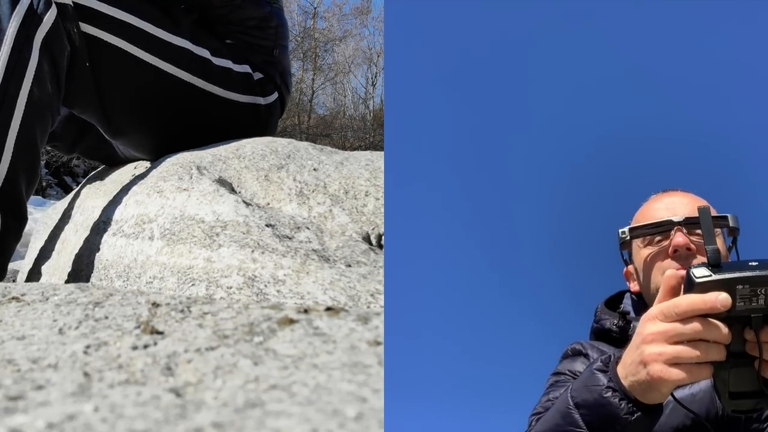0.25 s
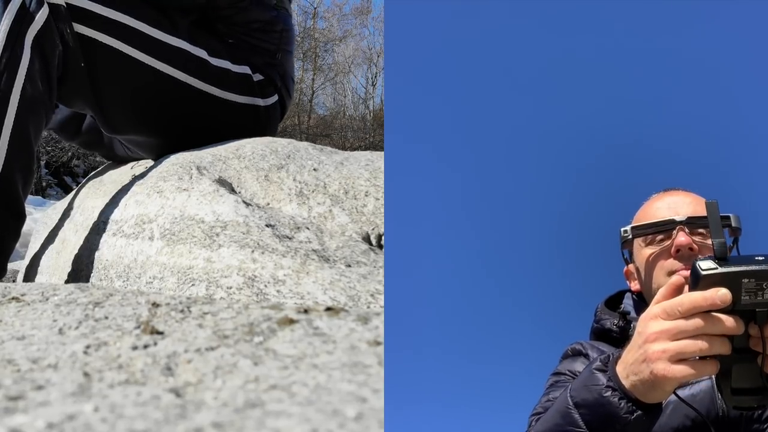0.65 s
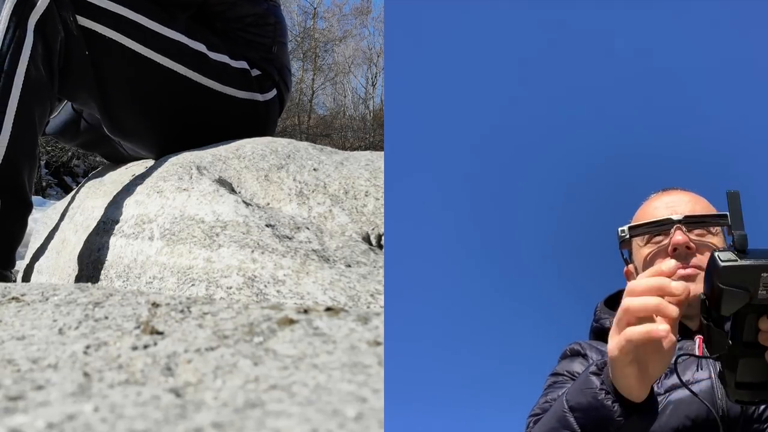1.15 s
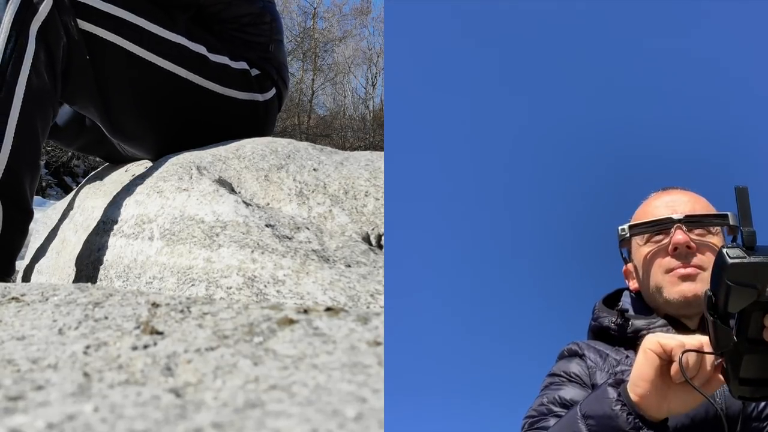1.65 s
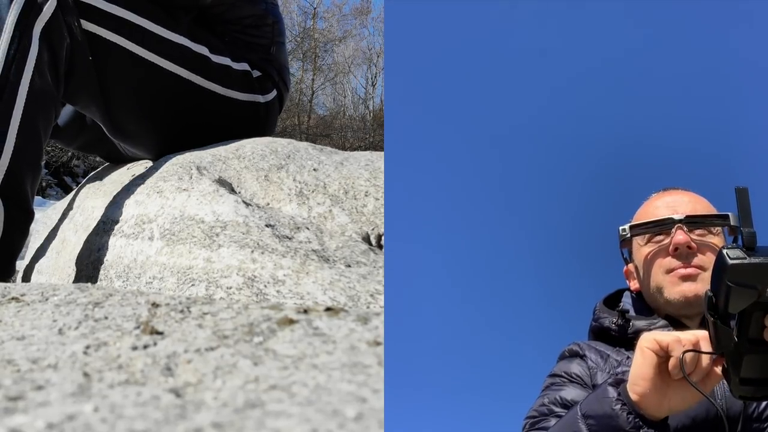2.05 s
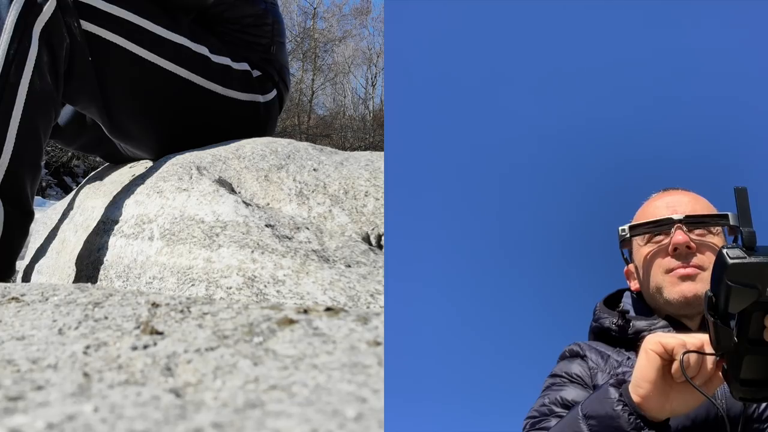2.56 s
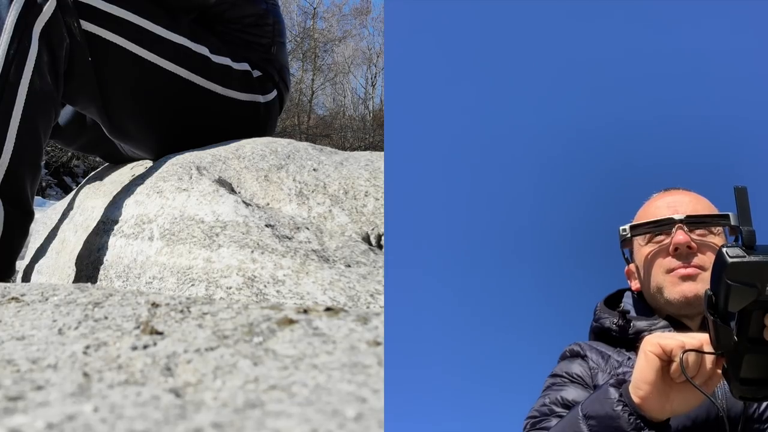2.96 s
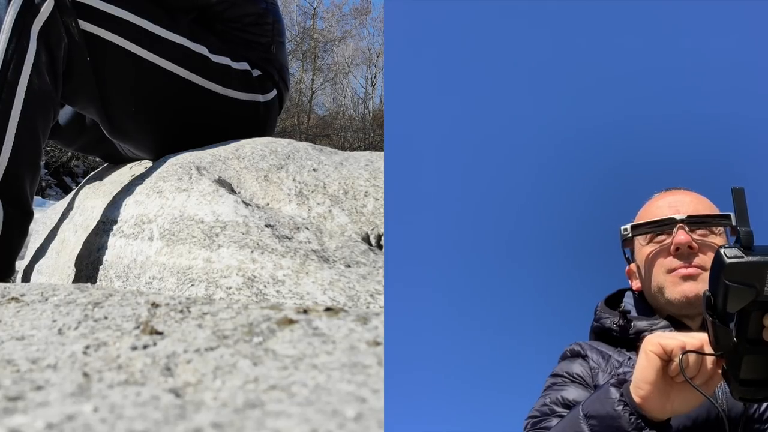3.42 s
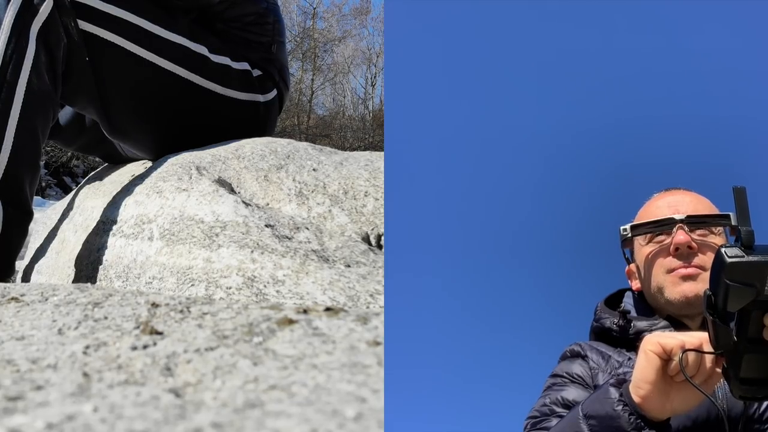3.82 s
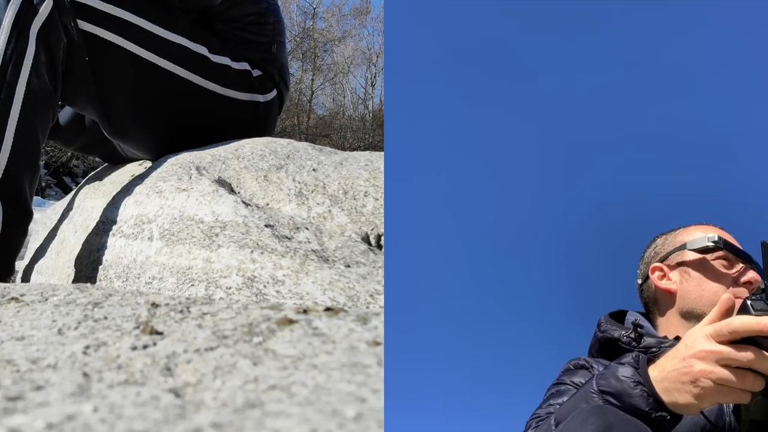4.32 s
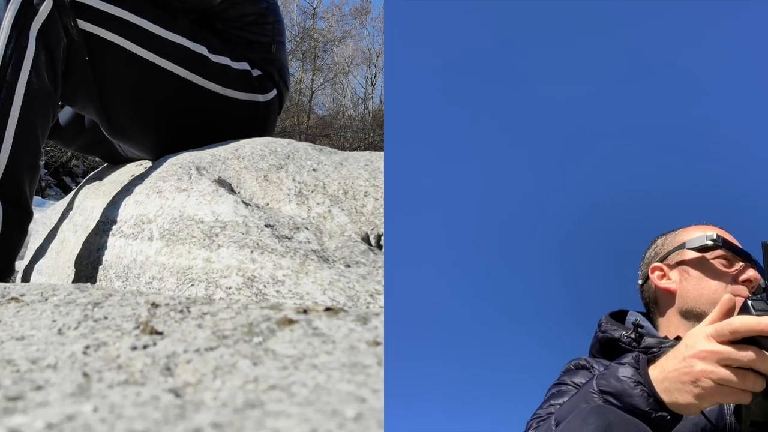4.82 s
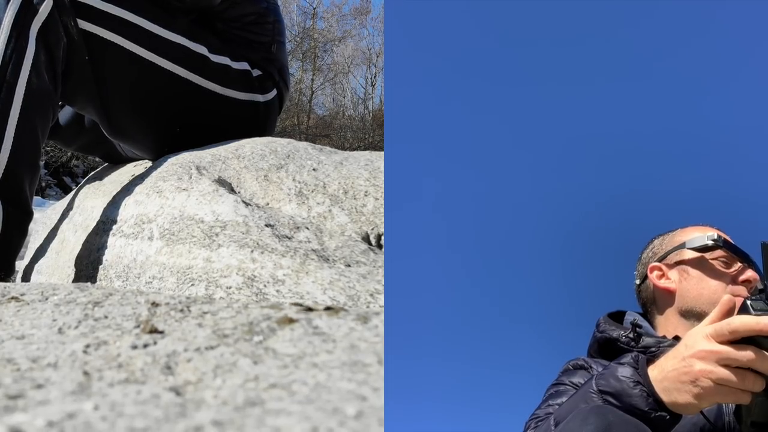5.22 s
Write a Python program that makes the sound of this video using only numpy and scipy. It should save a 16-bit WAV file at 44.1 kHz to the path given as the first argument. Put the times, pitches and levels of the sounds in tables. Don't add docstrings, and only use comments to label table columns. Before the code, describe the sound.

Faint fan hiss over a low wavering hum, a brief nylon rub, then four small rotors abruptly start and climb to a harsh buzzing roar.

```python
import sys
import numpy as np
from scipy import signal
from scipy.fft import rfft, irfft, next_fast_len
from scipy.io import wavfile

SR = 44100
rng = np.random.default_rng(int(sys.argv[2]) if len(sys.argv) > 2 else 0)


def output_pcm(signal):
    pcm = np.clip(np.atleast_2d(signal).T, -1, 1) * 32767
    wavfile.write(sys.argv[1], SR, np.round(pcm).astype(np.int16))


def amplitude_ratio(level_db):
    exponent = np.asarray(level_db, float) / 20
    return 10 ** exponent


N = 241646
TIME = np.arange(N) / SR
SIZE = next_fast_len(N + 256, True)
FREQ = np.maximum(np.arange(SIZE // 2 + 1) * SR / SIZE, 1)

# (blade rate at the start [Hz], gain of the unchecked motor [Hz], rate held by the governor [Hz],
# later creep [Hz], bend of the creep [under 1 early, over 1 late])
ROTORS = [
    (163.6, 396, 356, 28, .5),
    (161.4, 392, 351, 14.04, 2.208),
    (123.45, 350, 330, 17, 1.4),
    (130.4, 385, 336, 25, 1.8),
]
START_S, HANDOVER_S = 4.298, .94 + 4
FULL_HZ = 350


def curves(table, off_db=-120):
    s, *columns = np.transpose(table)
    gate_db = np.interp(TIME, [s[0] - .003, s[0], s[-1], s[-1] + 0.015], [off_db, 0, 0, off_db])
    return [np.interp(TIME, s, c) for c in columns], amplitude_ratio(gate_db)


def tilt(hz, points):
    f, db = np.transpose(points)
    return amplitude_ratio(np.interp(np.log(hz), np.log(f), db))


def noise(gain):
    x = irfft(rfft(rng.standard_normal(SIZE)) * gain, SIZE)[:N]
    return x / x.std()


def walk(rate_hz, time=TIME):
    grid = np.arange(2400)
    x = irfft(rfft(rng.standard_normal(len(grid))) / (1 + (grid[:1201] / 6 / rate_hz) ** 4))
    return np.interp(time, grid / 400, x / x.std())


def banded(points, swell_db, flicker_db, flicker_hz, gate=np.ones(N)):
    live = np.flatnonzero(gate > 1e-5)
    size = next_fast_len(len(live), True)
    hz = np.maximum(np.arange(size // 2 + 1) * SR / size, 1)
    time, out = TIME[live], np.zeros(N)
    swell = swell_db * walk(0.63, time)
    spectrum = rfft(rng.standard_normal(size)) * tilt(hz, points)
    for octave in np.arange(4, 15):
        band = np.cos(np.pi / 2 * np.clip(np.log2(hz) - octave, -1, 1)) ** 2
        flicker = flicker_db * walk(flicker_hz, time)
        out[live] += irfft(spectrum * band, size)[:len(live)] * amplitude_ratio(swell + flicker)
    return out / out[live].std()


def turn(hz):
    return 2 * np.pi * (np.cumsum(hz) / SR + rng.random())


def shift(x, lag_s, gain=1):
    return irfft(rfft(x, SIZE) * gain * np.exp(-2j * np.pi * FREQ * lag_s), SIZE)[:N]


def lulls(rows):
    return sum(db * np.exp(-((TIME - s) / width_s) ** 2) for s, width_s, db in rows)


def blade_rate(start_hz, gain_hz, held_hz, creep_hz, bend):
    inertia_s, spin_up_s, settle_s, creep_s = .025, .9, 5.22, .26
    overshoot_hz, overshoot_s, knee_hz = 11, 0.1313, 4.03
    run = np.maximum(TIME - START_S, 0)
    run = run - inertia_s * (1 - np.exp(-run / inertia_s))
    climb = start_hz + gain_hz * (1 - np.exp(-run / spin_up_s))
    over = overshoot_hz * np.exp(-((TIME - settle_s) / overshoot_s + 1) ** 2 * 2)
    held = held_hz + over + creep_hz * (np.maximum(TIME - settle_s, 0) / creep_s) ** bend
    return -knee_hz * np.logaddexp(-climb / knee_hz, -held / knee_hz)


def rotors():
    orders = [(.5, -18.5, -14, -15.5, -22), (1, 1.5, 5.5, -5, 7.5), (1.5, -33, -21.5, -43, -22),
              (2, 2.5, -2.5, 5, 6.5), (1.9, -34, -22.5, -26, -29), (4, -30, -29, -21, -26),
              (5.2, -23, -18, -35, -21), (3, -10, -2.5, -1.5, -15), (4, 3.5, -8.5, 4, -12),
              (5, -13, -7, -16.5, -14.5), (6.8, -10.5, -36, -22, -25.5), (7, -15.5, -30, -4, -23),
              (8.8, -25, -33, -12, -26)]
    # (frequency [Hz], level [dB])
    air_path = [(80, 4), (200, 2.5), (400, -2), (500, -7), (580, -2), (730, 4.5), (1050, 1.5), (1250, 1.5),
                (1500, -6), (3000, 0)]
    # (multiple of the blade rate, shell resonance [Hz], width [Hz], level of rotors one to four [dB])
    whines = [(14.2, 2420, 600, -50, -37.5, -47, -52), (14, 4700, 900, -50, -42, -46, -50),
              (48, 8800, 650, -56, -43, -43, -54), (24, 8200, 700, -46, -43, -44, -45)]
    # (while climbing [dB], once governed [dB])
    speed_levels = [(-49, -26), (-20, -25), (-23, -27), (-41, -30.5)]
    # (time [s], half width [s], level [dB])
    rotor_dips = [
        [(5.17, 0.025, -5)],
        [(5.14, 0.022, -13), (4.4, .03, -3), (4.33, 0.053, -3.5)],
        [(5.08, 0.064, -22), (4.8, 0.083, -4)],
        [(5.3, 0.07, -9.5), (5.47, .04, -2.5)],
    ]
    gate = np.clip((TIME - START_S) / .004 + 1, 0, 1)
    live = gate > 0
    time, out = TIME[live], np.zeros(N)
    governed = .5 + .5 * np.tanh((time - HANDOVER_S) / 0.017)
    for r in range(4):
        hz = blade_rate(*ROTORS[r])[live]
        climbing_db, governed_db = speed_levels[r]
        db = climbing_db + (governed_db - climbing_db) * governed
        db = db + 13.5 * np.log2(hz / FULL_HZ) + lulls(rotor_dips[r])[live]
        phase = turn(hz * (1 + 0.00397 * walk(25, time)))
        for k, *order_db in orders:
            flutter_db = np.minimum(.8 * k, 4.5) * walk(35, time) - 3.3 * k * (1 - hz / 360)
            tone = np.sin(k * phase + 2 * np.pi * rng.random())
            out[live] += tilt(k * hz, air_path) * amplitude_ratio(db + order_db[r] + flutter_db) * tone
        for k, shell_hz, width_hz, *whine_db in whines:
            ring = 1 / (1 + (2 * (k * hz - shell_hz) / width_hz) ** 4)
            out[live] += ring * amplitude_ratio(whine_db[r] + 3.2 * walk(40, time)) * np.sin(k * phase)
    return gate * out


def wash(low_db, high_db):
    # (time [s], level [dB])
    effort = [
        (4.29, -77),
        (4.308, -42),
        (4.44, -38.5),
        (4.78, -30.5),
        (4.98, -25.5),
        (5.18, -27),
        (5.36, -34.5),
        (5.48, -28.5),
    ]
    # (frequency [Hz], level [dB])
    roar_colour = [(60, -2), (200, -13), (350, -11.5), (500, -20.5), (600, -18.5), (750, -5.5), (1000, 2.5),
                   (1200, -6.5), (1380, 2), (2720, -6.5), (2950, -11), (4500, -27), (7000, -26)]
    # (frequency [Hz], level [dB])
    tip_colour = [(2000, -30.5), (3000, 9), (4300, -2), (5500, 2.5), (7000, -2.5), (8500, -2.5), (10000, 0),
                  (12300, -3.5), (15300, -5.5)]
    (db,), gate = curves(effort)
    treble_db = -30 + 14 * np.log2(blade_rate(*ROTORS[1]) / FULL_HZ)
    treble_db = treble_db + 3 * (TIME > HANDOVER_S)
    treble_db = treble_db - 8 * np.exp(-np.maximum(TIME - START_S, 0) / 0.017)
    roar = amplitude_ratio(db + low_db) * banded(roar_colour, 0.77, 2.36, 25, gate)
    onset = np.clip((TIME - effort[0][0]) / .015, 0, 1) ** 2
    hiss = onset * amplitude_ratio(treble_db + high_db) * banded(tip_colour, 0.24, 2.0, 39, gate)
    return gate * (roar + hiss)


def fan():
    # (frequency [Hz], width [Hz], level [dB])
    duct_rows = [(1148, 13, -16.5), (1460, 217, -0.5), (1946, 108, -5), (2408, 103, -3.5), (2707, 67, -5.5),
                 (3115, 23.4, -1), (3447, 64, -3.5), (3650, 33, -24.5)]
    ducts = sum(amplitude_ratio(2 * db) / (1 + (2 * (FREQ - hz) / width_hz) ** 4) for hz, width_hz, db in duct_rows)
    return amplitude_ratio(-59.5 + 0.55 * walk(16)) * noise(np.sqrt(ducts))


def fan_whine():
    # (frequency [Hz], level [dB])
    shaft_lines = [(1087.5, -66), (1359, -69.5), (2718, -80)]
    return sum(amplitude_ratio(db + 7 + 1.5 * walk(4)) * np.sin(turn(hz + 1.5 * walk(3))) for hz, db in shaft_lines)


def sleeve():
    # (start [s], fastest [s], end [s], hiss level [dB], puff level [dB])
    strokes = [
        (1.1, 1.219, 1.313, -60.5, -64.5),
        (1.23, 1.418, 1.567, -54.5, -49),
    ]
    # (frequency [Hz], level [dB per Hz])
    cloth_colour = [(900, -20), (2000, -1.5), (4400, -5.5), (6000, -8.5), (9000, -9.5), (12000, -10),
                    (16000, -14)]
    puff_colour = [(120, -19), (220, -1), (450, -7.0), (800, -11), (1500, -10.5), (3000, -54)]
    hiss_gain = puff_gain = 0
    for start_s, fastest_s, end_s, hiss_db, puff_db in strokes:
        speed = np.interp(TIME, [start_s - .02, start_s, fastest_s, end_s, end_s + .02], [0, 0, 1, 0, 0])
        bend_db = np.where(TIME < fastest_s, 5.5 * (speed - 1), -26 * (1 - speed) ** 2)
        swell = np.sqrt(speed) * amplitude_ratio(bend_db)
        hiss_gain = hiss_gain + amplitude_ratio(hiss_db) * swell
        puff_gain = puff_gain + amplitude_ratio(puff_db) * swell ** 0.67
    gate = 1. * ((TIME > strokes[0][0]) & (TIME < strokes[-1][2]))
    hiss = amplitude_ratio(1.5) * hiss_gain * banded([(500, -39)] + cloth_colour, 0.57, 0.89, 35, gate)
    puff = amplitude_ratio(4.5) * puff_gain * banded(puff_colour, .5, 4.6, 60, gate)
    return hiss, puff


def hiss_bands(hiss):
    # (frequency [Hz], width [Hz], level [dB])
    band_rows = [(5450, 500, 6), (7350, 450, 12)]
    band_gain = sum(amplitude_ratio(db) / (1 + (2 * (FREQ - hz) / width_hz) ** 2) for hz, width_hz, db in band_rows)
    return shift(hiss, 0, band_gain / 2)


def ticks():
    # (time [s], frequency [Hz], level [dB])
    creaks = [
        (0.558, 9600, -55),
    ]
    out = 0
    for s, hz, db in creaks:
        out = out + amplitude_ratio(db) * np.exp(-((TIME - s) / .0008) ** 2) * np.sin(2 * np.pi * hz * TIME)
    return out


def machinery():
    # (time [s], frequency [Hz], level [dB], octave level [dB])
    hum = [(0, 80.6, -27.5, -40), (.15, 79.84, -38, -35.5), (.55, 78.1, -29, -34.5), (.7, 74, -28.5, -46.5),
           (.91, 73, -23, -41), (1.4, 73.3, -24, -42), (2, 73.15, -29.5, -42.5), (3.45, 73.2, -26.5, -44),
           (4.2, 73, -27, -45), (4.4, 71.9, -28, -43), (5.48, 72.4, -35.5, -47)]
    # (time [s], frequency [Hz], level [dB])
    deep = [
        (0, 47.4, -31),
        (.5, 45.8, -40),
        (1.15, 49.83, -34.5),
        (4.17, 50.14, -36.5),
        (4.33, 52.5, -40),
    ]
    # (time [s], frequency [Hz], level of multiples one to three [dB])
    throb = [
        (4.28, 33, -38, -48, -42),
        (5.48, 32.7, -37, -54, -41.5),
    ]
    # (time [s], frequency [Hz], level [dB])
    climbing = [
        (1.6, 77, -52),
        (2.0, 78, -40),
        (2.8, 79, -41),
        (3.4, 84, -45),
        (4.0, 89, -46),
        (4.3, 92, -52),
    ]
    # (time [s], half width [s], level [dB])
    hum_dips = [
        (1.57, 0.022, -6),
        (1.82, 0.099, -4),
        (3.52, 0.041, -20),
    ]
    # (time [s], half width [s], level [dB])
    deep_dips = [
        (.62, 0.086, -7),
        (1.87, 0.036, -11.5),
        (2.7, 0.044, -14),
        (3.02, 0.059, -8),
    ]
    out = 0
    for name, table in (("hum", hum), ("deep", deep), ("throb", throb), ("climbing", climbing)):
        (hz, *levels), gate = curves(table)
        phase = turn(hz * (1 + 0.0064 * walk(5.17)))
        if name == "hum":
            gate = gate * amplitude_ratio(lulls(hum_dips))
            since_s = TIME - 4.55
            beat = 2 * np.pi * (6.2 - 1.72 * since_s ** 2) * since_s
            out = out + np.clip((TIME - 4.3) / 0.045, 0, 1) * amplitude_ratio(levels[0] + 0.5) * np.sin(phase - beat)
        if name == "deep":
            gate = gate * amplitude_ratio(2 * walk(7) + lulls(deep_dips))
        for k, db in enumerate(levels):
            waver_db = (1.5 + 0.32 * k) * walk(13.4)
            out = out + gate * amplitude_ratio(db + 1 + waver_db) * np.sin((k + 1) * phase)
    return out


def breeze():
    # (time [s], level [dB])
    strength = [
        (0.0, -40.5),
        (5.48, -41.5),
    ]
    # (frequency [Hz], level [dB per Hz])
    rumble_colour = [(20, -3), (40, 4), (70, 5), (110, 2), (160, -1), (220, -25), (300, -57.5)]
    (db,), _ = curves(strength)
    return amplitude_ratio(db) * banded(rumble_colour, 0.56, 2.9, 14)


def gust():
    # (frequency [Hz], level [dB per Hz])
    gust_colour = [(110, -25.5), (180, 7.5), (260, -1.5), (400, -8), (700, -10.5), (1000, -57.5)]
    fade = np.clip((4.3 - TIME) / .02, 0, 1)
    return fade * amplitude_ratio(-58.5 + 1.4 * walk(15)) * banded(gust_colour, .3, 1.2, 37)


def open_air():
    # (frequency [Hz], level [dB per Hz])
    air_colour = [(7000, -24.5), (9000, -8.5), (11000, 1.5), (13000, 5), (15500, -9.5)]
    return amplitude_ratio(-83.5) * noise(tilt(FREQ, air_colour))


def scene():
    blades = rotors()
    (hiss, puff), (other_hiss, other_puff) = sleeve(), sleeve()
    shared = fan() + fan_whine() + ticks() + puff + gust()
    bass = machinery() + breeze()
    first = 1.235 * bass + 0.95 * blades + wash(4.37, -4.5) + shared + hiss
    shade = 1 / np.sqrt(1 + (FREQ / 1300) ** 4)
    second = shift(blades, -0.00031, 0.37 * shade) + wash(-0.58, -3.25)
    second = second + shift(shared, 0.000072, 0.57 * shade) + 1.37 * fan()
    second = second + other_hiss + 0.25 * other_puff - .18 * bass
    air = [open_air() for _ in range(2)]
    return np.array([first, second]) + air + hiss_bands(hiss + other_hiss)


def low_pass(x):
    return signal.sosfilt(signal.butter(12, 15480, fs=SR, output="sos"), x)


def record(dry):
    # (frequency [Hz], level [dB])
    late_colour = [(100, -.3), (700, -2), (1200, -7), (2000, -3), (3200, -5), (5400, -9), (7300, -1.5),
                   (9300, -5), (10600, 0)]
    # (frequency [Hz], lead [rad])
    late_lead = [(200, 0), (1100, .45), (3200, .25), (5400, .45), (7300, 0), (11300, -.3), (13500, .05)]
    # (frequency [Hz], level [dB per Hz])
    floor_colour = [(200, -12.5), (400, -6.5), (1000, 2.5), (1600, -9), (2700, -3.5), (4000, -18.5),
                    (6000, -22.5), (7700, -25), (8200, -20), (8700, -35), (10000, -20.5), (11000, -36)]
    first, second = dry
    cross_s, floor = 21.15 / 44100, amplitude_ratio(-56.5)
    late = tilt(FREQ, late_colour) * np.exp(1j * np.interp(FREQ, *np.transpose(late_lead)))
    left = shift(first, cross_s, late) + second + floor * banded(floor_colour, 0.28, 1.3, 24)
    right = first + shift(second, cross_s, late) + floor * banded(floor_colour, 0.96, 1.6, 14)
    port_db = 5.7 / (1 + ((FREQ - 8800) / 1100) ** 4)
    bass_db = 1.1 / (1 + (FREQ / 150) ** 2)
    left = shift(left, 0, amplitude_ratio(port_db + bass_db))
    return low_pass(np.array([left, right]))


dry = scene()
out = record(dry)
output_pcm(out)
```